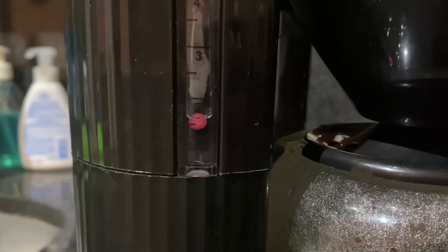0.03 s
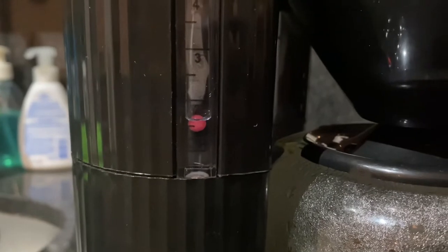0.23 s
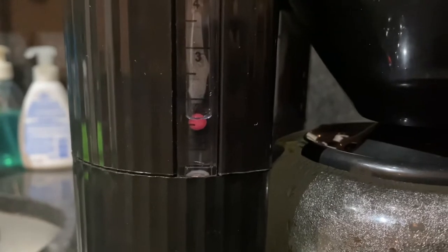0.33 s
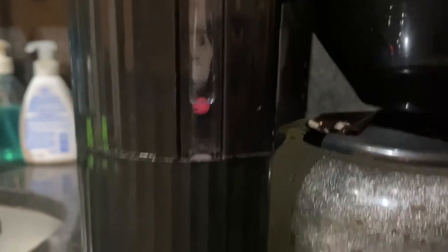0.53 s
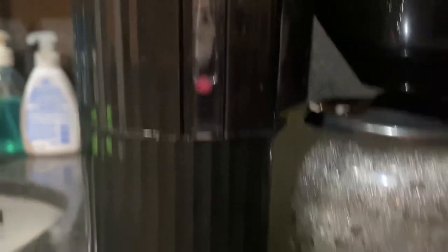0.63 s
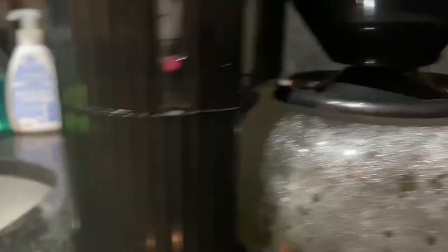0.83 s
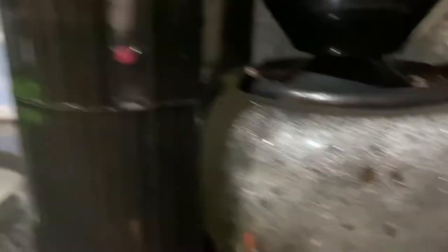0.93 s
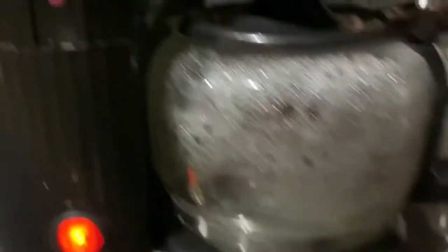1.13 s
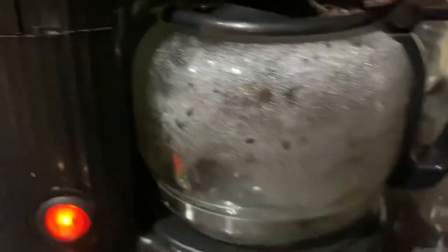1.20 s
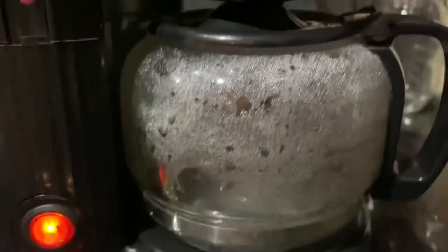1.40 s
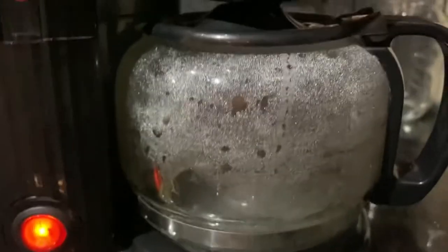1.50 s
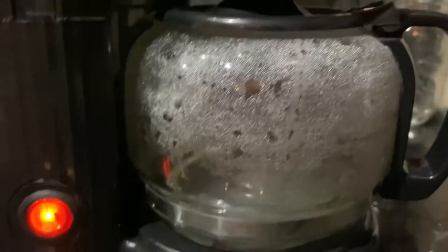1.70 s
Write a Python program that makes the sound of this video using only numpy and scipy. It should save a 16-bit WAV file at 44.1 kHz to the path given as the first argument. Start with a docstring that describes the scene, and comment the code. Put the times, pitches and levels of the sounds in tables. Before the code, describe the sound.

A drip coffee maker brews close by in a kitchen. It starts with short crackly, fizzy bursts and small pops. Around 0.5 seconds come the loudest sounds, a few hollow gurgling thumps, leaving a low rumble that fades by about 1.1 seconds. From 0.8 to 1.6 seconds, drops tick irregularly into the glass carafe, ringing it lightly. Faint high hiss and simmering lie underneath.

```python
"""Drip coffee maker brewing

Close by in a kitchen, bursts of crackly rustling lead to a few hollow low thumps that leave a rumble.
Short pitched pops decay as damped oscillators, and drops tick, many exciting the glass carafe's modes.
A faint high hiss, simmering and mains hum lie underneath."""
import sys
import numpy as np
from scipy import signal
from scipy.fft import rfft, irfft, next_fast_len
from scipy.io import wavfile
from scipy.ndimage import map_coordinates

SR = 44100
rng = np.random.default_rng(int(sys.argv[2]) if len(sys.argv) > 2 else 0)


def dump_mix(stems):
    """Bounce the given channels to the path in sys.argv[1] as a 16-bit WAV at rate SR."""
    frames = np.atleast_2d(stems).T  # one column per channel
    limited = np.clip(frames, -1, 1)  # hard clip at full scale
    pcm = np.round(limited * 32767).astype(np.int16)
    wavfile.write(sys.argv[1], SR, pcm)


N = 77175

ATTACK_S, TOP_HZ = 0.00074, 15900


def thumps(sag_per_s=0.81, tone_t60=0.051, thud_hz=283, thud_s=0.001284, ring_t60=0.37):
    """Resonance: each thud rings the room's low modes; a hollow tone swells and sags amid low noise."""
    # Each row: start in seconds, tone level in dB, pitch in Hz, rise time in seconds,
    # seconds until the decay begins, thud level in dB.
    events = [(0.155, -46.5, 377, 0.005, 0.019, -51.5), (0.334, -41.5, 548, 0.0026, 0.0038, -72),
              (.472, -23.5, 376, 0.024, 0.024, -28.5), (.529, -26, 342, 0.0063, 0.024, -29.5),
              (0.5968, -38.5, 361, 0.0013, 0.004, -33), (.603, -40, 150, 0.0016, 0.0056, -43),
              (0.633, -39.5, 86.7, 0.013, 0.013, -66), (0.679, -35, 353, 0.006, 0.0057, -43),
              (0.721, -49, 374.6, 0.0086, 0.011, -57)]
    # Each row: frequency in Hz, gain in dB.
    noise_colour = [(40, -48), (100, 4.5), (290, 4.5), (660, -2.5), (800, -13.5), (2000, -34)]
    dry, noise_gain, t = np.zeros(N), np.zeros(N), np.arange(SR // 2) / SR
    lag = t - 2 * thud_s
    thud = 2 * np.sin(2 * np.pi * thud_hz * lag) * np.exp(-(lag / thud_s) ** 2)
    for start, db, hz, rise, hold, thud_db in events:
        swell = np.minimum(t / rise, 1)
        release = fade(np.maximum(t - hold, 0), tone_t60)
        tone = np.sin(2 * np.pi * np.cumsum(hz * np.exp(-sag_per_s * t)) / SR)
        modes = sum(np.sin(2 * np.pi * (mode_hz * t + rng.random())) for mode_hz in (135, 233, 459, 466))
        ring = amp(-19.5) * modes * swell * fade(t, ring_t60)
        add(dry, start, amp(db) * tone * swell * release + amp(thud_db) * (thud + ring))
        add(noise_gain, start, amp(thud_db - 8.5) * release * np.minimum(t / thud_s, 1))
    return dry + amp(-14) * room(dry) + noise_gain * noise(noise_colour)


def rustle(base_t60=0.042, t60_per_length=2.2):
    """Amplitude modulation: crackly, fizzy rustling comes in bursts, with a faint glassy ring."""
    # Each row: start in seconds, length in seconds, level in dB, fizz relative to that in dB.
    bursts = [(0.042, 0.028, -52.5, -11.5), (0.112, 0.014, -53, -27), (0.143, 0.023, -53, -25),
              (0.225, 0.0071, -50.5, -7), (0.2545, 0.018, -49, -14.5), (0.269, 0.025, -48, -11.5),
              (0.306, 0.036, -49, -6), (0.354, 0.007, -52, -1.5), (0.373, 0.018, -49.5, -41),
              (0.409, 0.0076, -51, -10), (0.4188, 0.0057, -46, -4.5), (0.438, 0.014, -51, -24),
              (0.471, 0.0058, -47.5, -6.5), (0.503, 0.012, -45, -1), (0.537, 0.021, -51.5, -2)]
    # Each row of these three spectra: frequency in Hz, gain in dB.
    crackle_colour = [(700, 1), (1600, 10), (2700, 1.5), (3400, 14), (4200, -5)]
    fizz_colour = [(2000, -16.5), (4100, -4), (4750, 3.5), (5600, -5), (6900, -3.5), (8000, -4),
                   (10000, 0.5), (16000, -14)]
    hollow_colour = [(100, -21), (280, 4), (355, 9.5), (560, -4), (900, -46)]
    body_gain, fizz_gain, t = np.zeros(N), np.zeros(N), np.arange(SR // 6) / SR
    for start, length, db, fizz_db in bursts:
        release = fade(np.maximum(t - length, 0), base_t60 + t60_per_length * length)
        envelope = amp(db) * attack(t) * release
        add(body_gain, start, envelope)
        add(fizz_gain, start, amp(fizz_db) * envelope)
    crackle = stereo([swarm(456, 5550, spread_db=6) for _ in range(2)], crackle_colour)
    fizz = stereo([swarm(2775, TOP_HZ, spread_db=4.5) for _ in range(2)], fizz_colour)
    body = amp(-3.5) * noise(hollow_colour) + amp(-1.5) * crackle
    dry = fizz_gain * fizz + body_gain * body
    return dry + amp(-14.5) * through_glass(dry)


def swarm(low_hz, high_hz, spread_db, per_s=750, t60_cycles=17.5):
    """Superposition: brief damped sinusoids at random times and pitches merge into a crackle."""
    when, pitch, strength = rng.random((int(per_s * N / SR), 3)).T[:, :, None]
    hz = low_hz * (high_hz / low_hz) ** pitch
    k = np.arange(512)
    notes = amp(spread_db * strength ** 2) * np.sin(2 * np.pi * hz * k / SR)
    notes *= fade(k / SR, t60_cycles / hz)
    samples = (when * N).astype(int) + k
    return np.bincount(samples.ravel(), notes.ravel(), N)[:N]


def pops():
    """Free vibration: short pitched pops and drip ticks, without a ring of the glass."""
    # Each row: start in seconds, relative level in dB, pitch in Hz.
    events = [(0.0417, -41, 4090), (0.1157, -45, 1490), (0.2354, -24.5, 3420), (0.2768, -33.5, 3360),
              (0.4214, -36, 2150), (0.5107, -35.5, 3360), (0.5103, -35.5, 6720), (0.5383, -43, 4200),
              (0.5493, -40.5, 4240), (0.6302, -32.5, 3344), (0.7534, -40.5, 6760), (.753, -43, 4260),
              (1.2725, -46.5, 6610), (1.3983, -36.5, 3400), (1.5806, -37, 6290), (1.6351, -43.5, 4530)]
    dry = np.zeros(N)
    for start, db, hz in events:
        add(dry, start, amp(db - 4) * ping(hz, t60=0.011, snap_db=-15, echo_db=-25.5))
    return dry


def drops(t60_cycles=7.1):
    """Impact excitation: each drop ticks, rings the carafe and shatters into spray."""
    # Each row: start in seconds, tick level in dB, tick pitch in Hz, ring and spray gains in dB.
    events = [(0.8313, -41.5, 1250, -44.5, -79), (.866, -45, 1790, -49, -48.5),
              (0.978, -44.5, 2970, -56.5, -49.5), (1.0318, -47, 2330, -42, -63),
              (1.1324, -41.5, 2000, -37.5, -44.5), (1.139, -57, 2200, -37.5, -53),
              (1.2442, -47.5, 6400, -51.5, -55), (1.293, -43.5, 2430, -61, -49),
              (1.364, -36.5, 3080, -54, -59), (1.3738, -44, 4300, -46, -55), (1.45, -35, 3380, -43.5, -53),
              (1.5251, -45.5, 1664, -44.5, -61), (1.58, -32, 4930, -55, -52),
              (1.593, -49.5, 1704, -49, -53.5)]
    dry = np.zeros(N)
    for start, db, hz, ring_db, spray_db in events:
        add(dry, start, amp(db) * ping(hz, t60_cycles / hz, snap_db=-6.5, echo_db=2.5))
        add(dry, start, amp(ring_db) * glass())
        add(dry, start, amp(spray_db) * spray())
    return dry


def ping(hz, t60, snap_db, echo_db, snap_t60=0.056, housing_t60=0.03):
    """Damped oscillator: a short note starts with a noisy snap and reverberates in the housing."""
    # Each row: frequency in Hz, gain in dB.
    snap_colour = [(300, -18), (3000, -13), (6500, -5), (16000, -22.5)]
    t = np.arange(SR // 20) / SR
    note = np.sin(2 * np.pi * hz * t) * fade(t, t60) * attack(t)
    note /= np.abs(note).max()
    walls = rng.standard_normal(len(t)) * fade(t, housing_t60) * attack(t)
    echo = signal.fftconvolve(note, walls / np.linalg.norm(walls))[:len(t)]
    snap_gain = amp(along(snap_colour, np.fft.rfftfreq(len(t), 1 / SR)))
    snap = irfft(rfft(rng.standard_normal(len(t))) * snap_gain, len(t)) * fade(t, snap_t60)
    return note + amp(echo_db) * echo + amp(snap_db) * snap


def glass(scatter_db=2.5, detune=0.029, neighbour_t60=0.094):
    """Modal vibration: the carafe's modes share the energy differently with each spot that is hit."""
    # Each row: mode frequency in Hz, relative level in dB, 60 dB decay time in seconds.
    modes = [(1633, -3, 0.078), (1842, -5.5, 0.097), (2342, -10.5, 0.25), (2445, 1.5, 0.16),
             (3486, -12, 0.14), (4275, -15, 0.097), (5640, -18.5, 0.14)]
    t = np.arange(SR // 3) / SR

    def partial(hz, t60):
        share = amp(scatter_db * rng.standard_normal())
        return share * fade(t, t60) * np.sin(2 * np.pi * (hz * t + rng.random()))

    ring = np.zeros(len(t))
    for hz, db, t60 in modes:
        mode = partial(hz, t60)
        neighbour = partial(hz * (1 + detune * rng.standard_normal()), neighbour_t60)
        ring += amp(db) * (mode + amp(-6) * neighbour)
    return ring * attack(t) / 2


def through_glass(x):
    """Forced vibration: a sound is convolved with the carafe's impulse response."""
    ring = glass()
    return signal.fftconvolve(x, ring[None] / np.linalg.norm(ring), axes=1)[:, :N]


def spray(low_cut_hz=6800, t60=0.032):
    """Broadband transient: a shattering drop gives a bright crack."""
    t = np.arange(SR // 20) / SR
    return high_pass(rng.standard_normal(len(t)) * fade(t, t60), low_cut_hz)


def simmer(flutter_db=1.0, flutter_per_s=40, trickle_start_s=0.75):
    """Random modulation: simmering noise flutters; later a trickle keeps the carafe ringing."""
    # Each row: time in seconds, relative level in dB.
    levels = [(.2, -63.5), (.45, -56.5), (1.11, -65), (1.38, -56.5), (1.62, -66), (1.7, -70.5)]
    # Each row: frequency in Hz, gain in dB.
    colour = [(100, -10.5), (370, 14), (600, -4.5), (1700, 7.5), (2050, -1.5), (3500, 3), (5000, -6.5),
              (16000, -20)]
    t = np.arange(N) / SR
    flutter = map_coordinates(rng.standard_normal(512), [t * flutter_per_s], mode="wrap")
    water = level(levels) * amp(flutter_db * flutter) * noise(colour)
    trickle = through_glass(water * (t > trickle_start_s))
    return amp(-3.5) * water + amp(-12) * trickle


def hiss():
    """Broadband noise: a faint high hiss rises and falls."""
    # Each row: time in seconds, relative level in dB.
    levels = [(.02, -59), (.19, -82), (.3, -53.5), (.95, -57.5), (1.12, -57.5), (1.4, -70.5)]
    # Each row: frequency in Hz, gain in dB.
    colour = [(2000, -8), (5000, 2), (7000, -6.5), (9000, 2), (14500, -3.5), (16000, -6)]
    return amp(-7.5) * level(levels) * noise(colour)


def rumble():
    """Low-frequency noise: a rumble swells with the thumps and dies away."""
    # Each row: time in seconds, relative level in dB.
    levels = [(.44, -69.5), (.6, -53), (.78, -58.5), (.9, -61), (1.12, -72.5), (1.3, -69.5), (1.55, -76.5),
              (1.75, -80.5)]
    # Each row: frequency in Hz, gain in dB.
    colour = [(25, -19), (60, 3), (150, 2), (260, -5), (700, -12), (2000, -47)]
    return amp(2) * level(levels) * noise(colour)


def hum(hz=60):
    """Pure tone: a faint sinusoid at the mains frequency."""
    return amp(-75) * np.sin(2 * np.pi * hz * np.arange(N) / SR)


def room(x):
    """Reverberation: the kitchen's short diffuse tail, different on each side."""
    # Each row: frequency in Hz, 60 dB decay time in seconds.
    decay = [(200, 0.2), (2000, 0.11), (10000, 0.17)]
    hz, t, bands = signal.stft(rng.standard_normal((2, SR // 4)), SR, nperseg=256)
    tail = signal.istft(bands * fade(t, along(decay, hz)[:, None]), SR, nperseg=256)[1]
    return signal.fftconvolve(x[None], tail / np.linalg.norm(tail[0]), axes=1)[:, :N]


def stereo(pair, colour):
    """Partial coherence: two unrelated signals become one coloured stereo signal of rms 1."""
    # Each row: frequency in Hz, left-right correlation from 0 to 1.
    coherence = [(40, 0.69), (300, 0.93), (1000, 0.57), (4000, 0.47), (9000, 1)]

    def response(hz):
        angle = np.arccos(along(coherence, hz)) / 2
        return amp(along(colour, hz)) * [np.cos(angle), np.sin(angle)]

    mid, side = filtered(pair, response)
    both = np.array([mid + side, mid - side])
    return both / np.sqrt(np.mean(both ** 2) + 1e-20)


def noise(colour):
    return stereo(rng.standard_normal((2, N)), colour)


def amp(db):
    return 10 ** (np.asarray(db) / 20)


def attack(t):
    return 1 - np.exp(-t / ATTACK_S)


def fade(t, t60):
    """Exponential decay, 60 dB in t60 seconds."""
    return np.exp(-np.log(1000) * t / t60)


def along(points, hz):
    """Interpolation of (Hz, value) points on a logarithmic frequency axis."""
    knots_hz, values = np.transpose(points)
    return np.interp(np.log(hz + 1), np.log(knots_hz + 1), values)


def level(points):
    """Amplitude envelope through (seconds, dB) points."""
    return amp(np.interp(np.arange(N) / SR, *np.transpose(points)))


def filtered(x, response):
    """Filtering as multiplication of the spectrum by a frequency response."""
    size = next_fast_len(N + SR // 2)
    return irfft(rfft(x, size) * response(np.fft.rfftfreq(size, 1 / SR)), size)[..., :N]


def high_pass(x, hz):
    return signal.sosfilt(signal.butter(2, hz, "high", fs=SR, output="sos"), x)


def add(track, start_s, sound):
    start = round(start_s * SR)
    part = sound[:max(0, N - start)]
    track[start:start + len(part)] += part


def scene():
    """Superposition of all the sounds, left and right."""
    ticks = pops() + drops()
    foreground = ticks + amp(-3) * room(ticks) + thumps() + rustle()
    return foreground + simmer() + hiss() + rumble() + hum()


def record(dry, low_cut_hz=45):
    """Stereo cues: the channels differ in level and phase; deep bass and the very top are cut."""
    # Each row: frequency in Hz, left minus right level in dB.
    balance = [(60, -2.5), (300, .5), (700, 1.5), (1300, 3), (2400, 2.5), (4600, 2.5), (8000, 0.5)]
    # Each row: frequency in Hz, phase lead of the left channel in radians.
    lead = [(300, 0), (900, .4), (1500, -.9), (3000, 1), (7300, -.2), (15800, -14.6)]
    sides = np.array([[.5], [-.5]])

    def response(hz):
        return amp(sides * along(balance, hz)) * np.exp(1j * sides * along(lead, hz)) * (hz < TOP_HZ)

    return filtered(high_pass(dry, low_cut_hz), response)


dry = scene()
out = record(dry)
dump_mix(out)
```